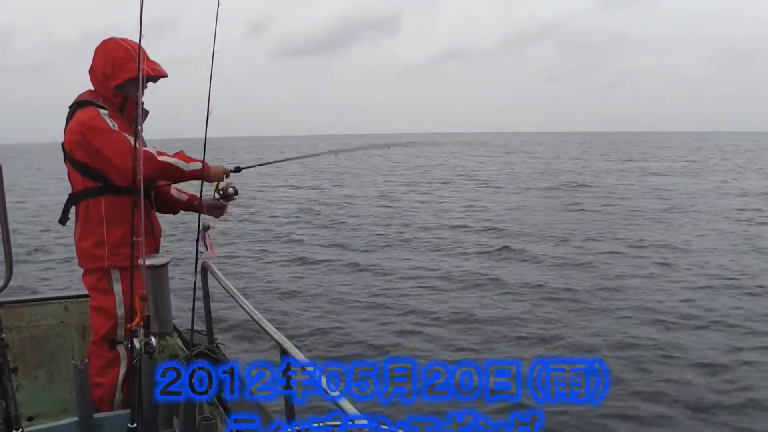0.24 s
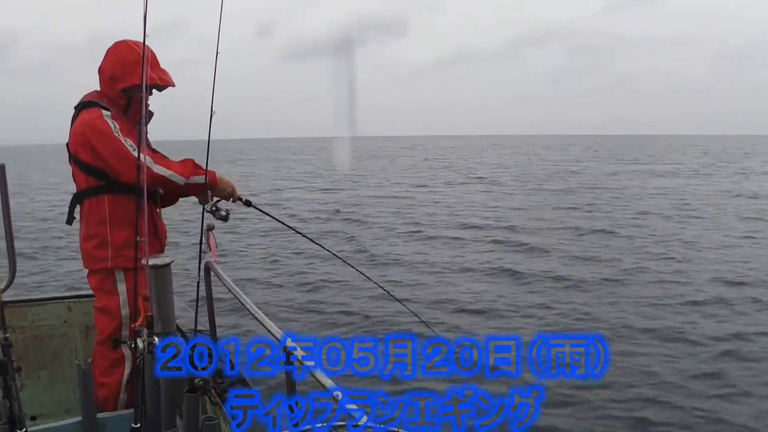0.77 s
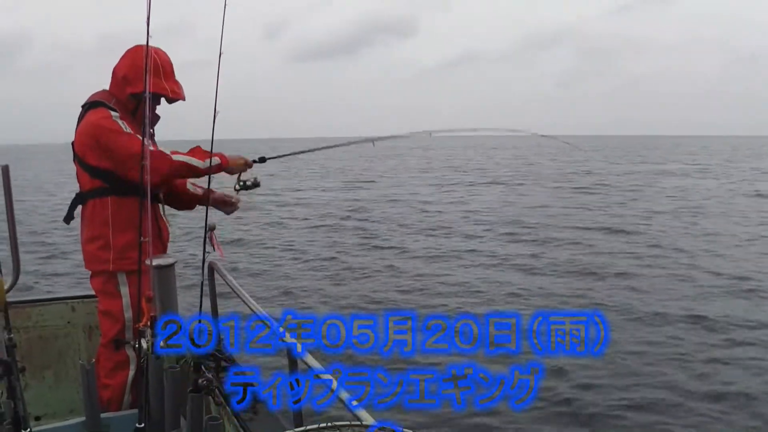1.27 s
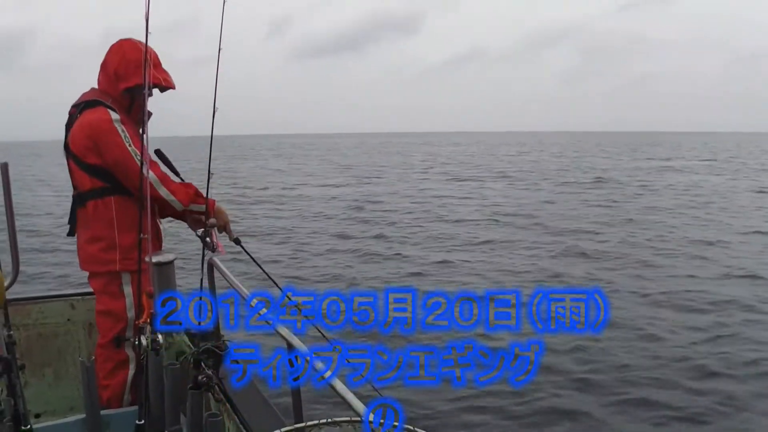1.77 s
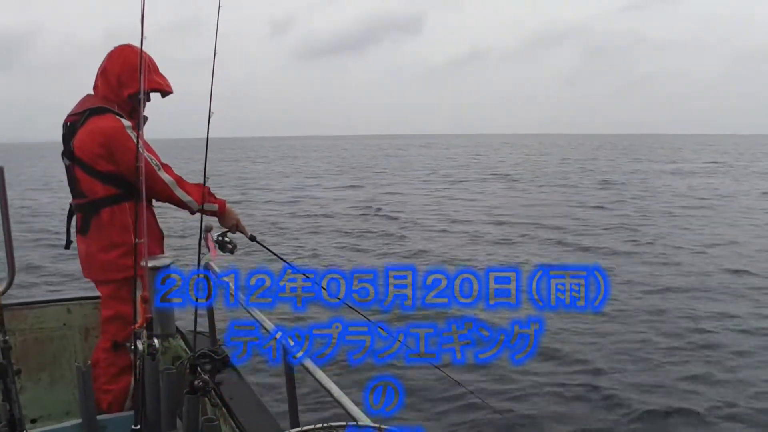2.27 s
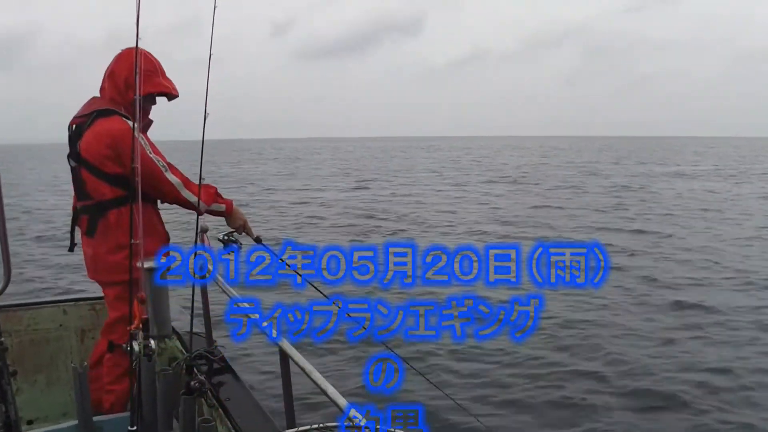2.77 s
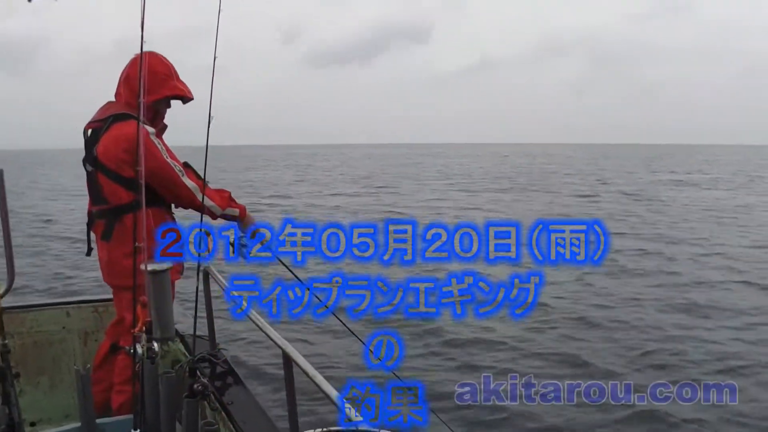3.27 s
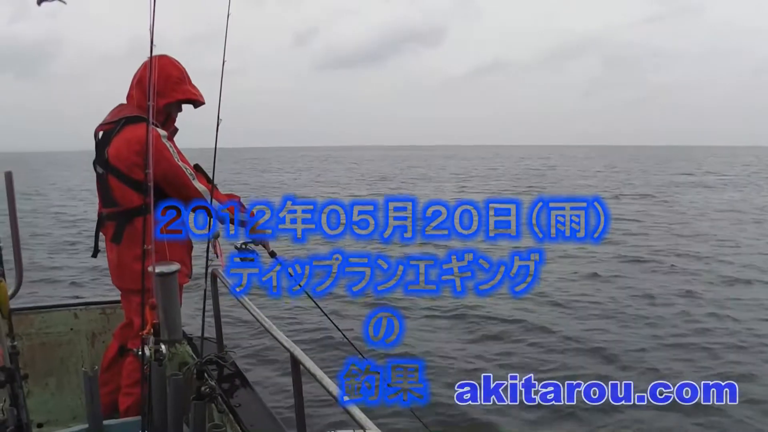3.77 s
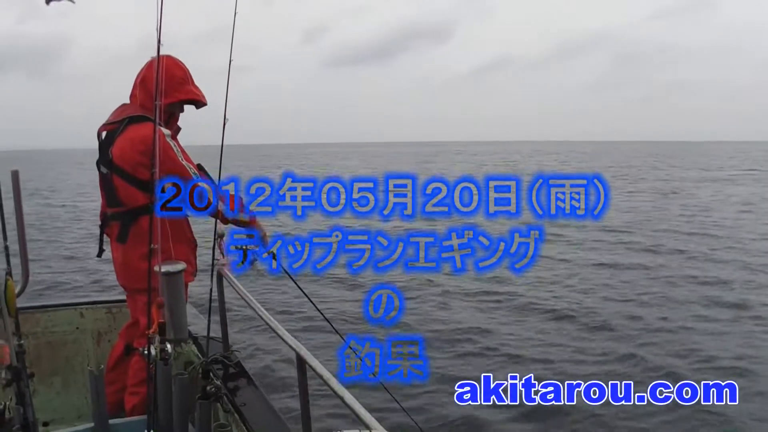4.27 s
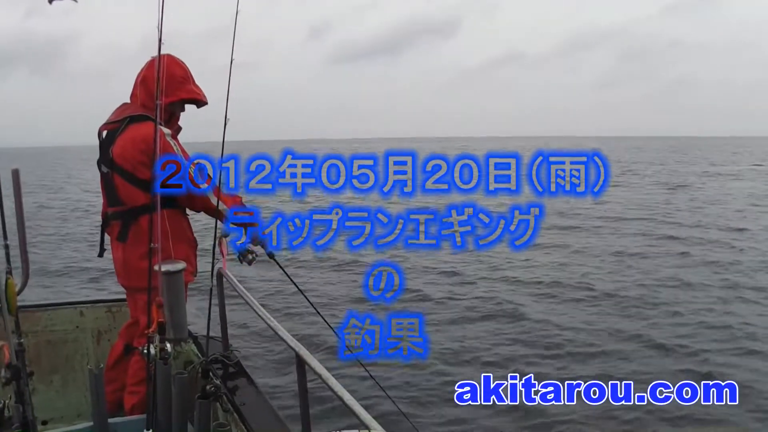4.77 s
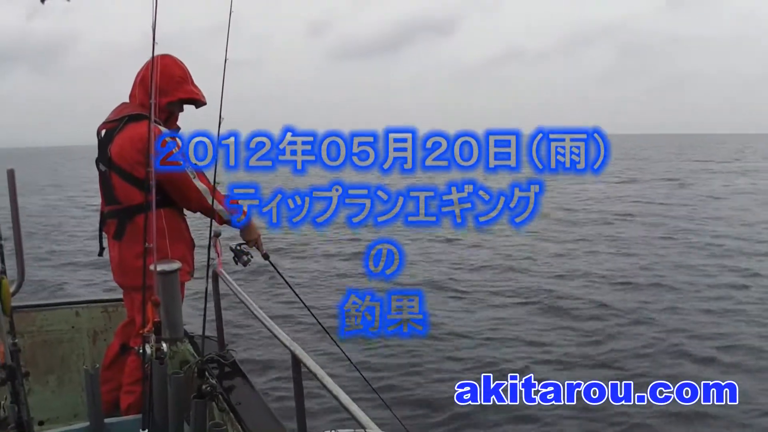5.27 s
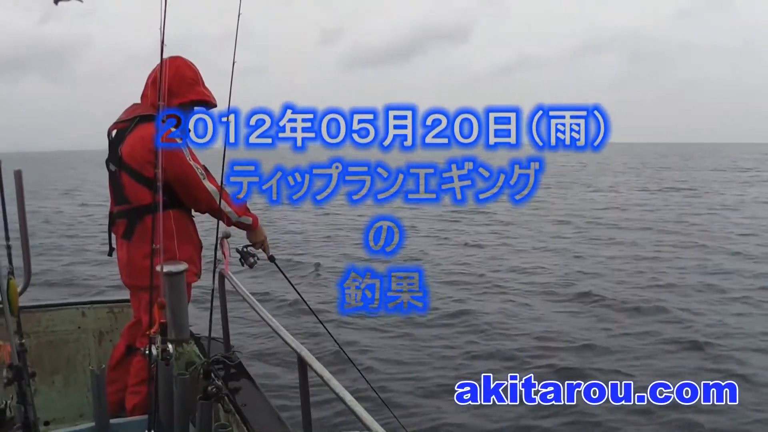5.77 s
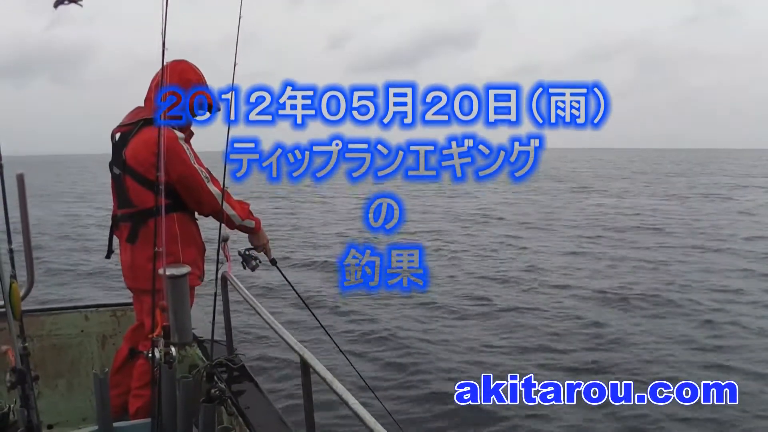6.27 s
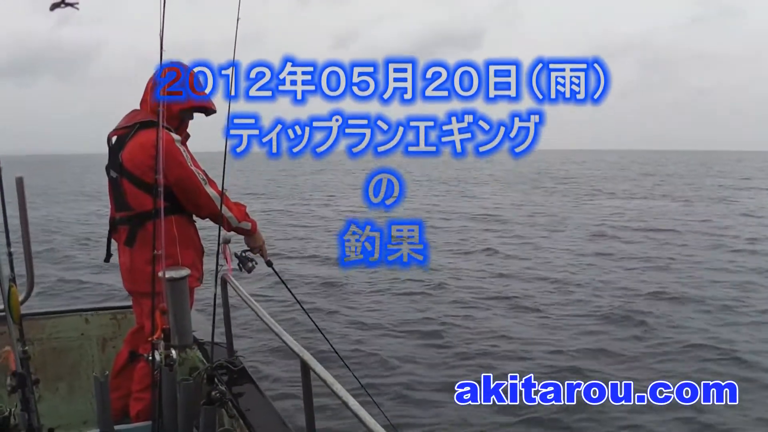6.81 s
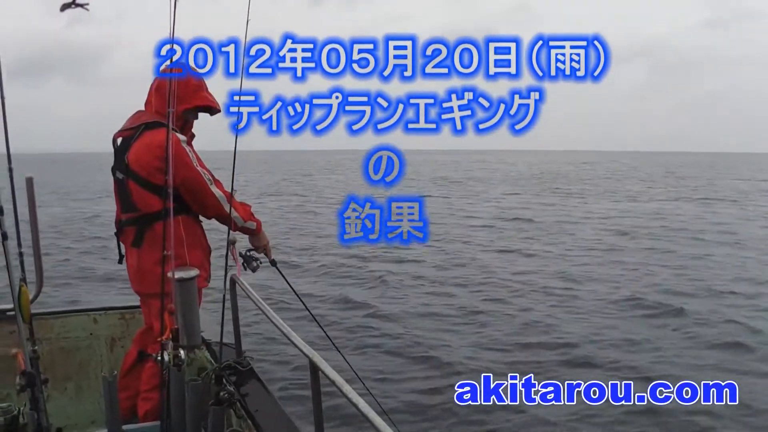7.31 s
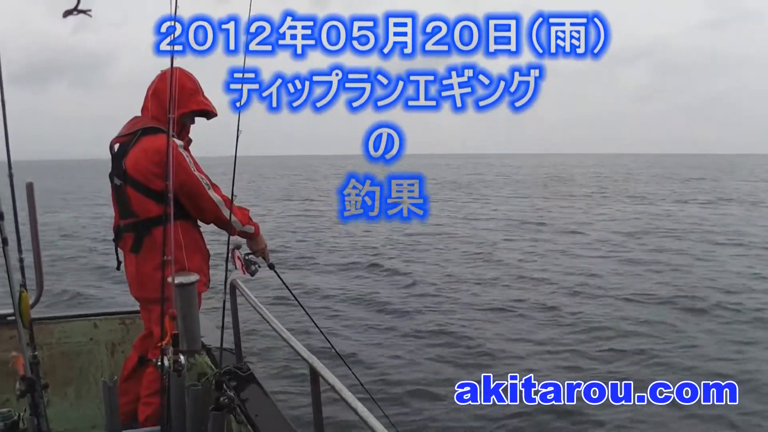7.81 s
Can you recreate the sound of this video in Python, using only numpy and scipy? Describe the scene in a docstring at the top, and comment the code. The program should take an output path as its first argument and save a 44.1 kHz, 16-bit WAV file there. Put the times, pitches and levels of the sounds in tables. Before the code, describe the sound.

Outdoors on a small fishing boat, light rain patters with crisp nearby ticks and occasional hollow knocks. For just over a second, an angler jerks a rod about three times a second: dry reel rasps, rustling rain jacket, thin line whistles and sharp clacks. Then only rain remains, with soft foam along the hull and irregular low wind thumps and flutters right at the microphone.

```python
"""Light rain on a small fishing boat

Drops tick on the deck and on rain gear as filtered clicks with short tails; a few knock on a hollow case.
An angler on the left jerks a rod about three times a second, then rests: reel and jacket rasp as
shaped noise, and the wet line whistles in the guides as bending tones. Foam made of tiny bubble clicks
washes along the hull, and gusts thump, gulp and flutter at the microphone as low noise and short tones."""
import sys
import numpy as np
from scipy import signal
from scipy.fft import rfft, irfft
from scipy.io import wavfile

SR = 44100
rng = np.random.default_rng(int(sys.argv[2]) if len(sys.argv) > 2 else 0)


def file_out(sig):
    """Save sig as 16-bit WAV at sys.argv[1]."""
    # one column per channel
    cols = np.atleast_2d(sig).T
    # limit, then scale
    lim = np.clip(cols, -1, 1)
    pcm = np.round(lim * 32767).astype(np.int16)
    wavfile.write(sys.argv[1], SR, pcm)


N = 355005
TIME = np.arange(N) / SR  # seconds
HZ = np.fft.rfftfreq(N, 1 / SR)


def from_db(db):
    """Turns decibels into a gain."""
    return 10 ** (np.asarray(db) / 20)


def unit(x):
    """Scales a signal to an rms of one."""
    return x / np.sqrt(np.mean(x ** 2) + 1e-20)


def at_hz(points, hz):
    """Reads a curve on a log-frequency axis."""
    point_hz, value = np.transpose(points)
    return np.interp(np.log(hz + 1), np.log(point_hz), value)


def in_time(rows):
    """Joins curve rows by straight lines, one array a column."""
    s, *columns = np.transpose(rows)
    return [np.interp(TIME, s, column) for column in columns]


def add(mix, s, sound):
    """Mixes a sound in at time s."""
    part = mix[..., max(round(s * SR), 0):][..., :sound.shape[-1]]
    part += sound[..., :part.shape[-1]]


def panned(x, pan_db):
    """Spreads a sound over left and right, left louder by pan_db."""
    return x * from_db(np.array([pan_db, -pan_db]).reshape(2, -1) / 2)


def random_signs():
    """A random plus or minus one for every sample."""
    return rng.choice([-1., 1.], N)


def drift(per_s):
    """Slow random wander of rms one; a higher per_s wanders faster."""
    spectrum = rfft(rng.standard_normal(N))
    return unit(irfft(spectrum * np.exp(-(HZ / per_s) ** 2), N))


def swell(s, rise_s, fall_s):
    """Builds smoothly to one at time s, then dies away."""
    return np.exp(-np.where(TIME < s, ((s - TIME) / rise_s) ** 2, (TIME - s) / fall_s))


def held(start, end, rise_s, fall_s):
    """Rises to one, holds from start to end, and dies away."""
    return np.exp(-np.maximum(start - TIME, 0) / rise_s - np.maximum(TIME - end, 0) / fall_s)


def swing(s, half_s):
    """An even rise and fall around time s."""
    return np.exp(-((TIME - s) / half_s) ** 2)


def click(spectrum, size=4096):
    """The sharpest pulse with this spectrum that has no sound before its start; its peak is one."""
    log_gain = np.log(from_db(at_hz(spectrum, abs(np.fft.fftfreq(size, 1 / SR)))))
    pulse = np.fft.ifft(np.exp(np.conj(signal.hilbert(log_gain)))).real[:size // 2]
    return pulse / abs(pulse).max()


def coloured(x, spectrum):
    """Gives a signal a spectrum without smearing it backwards."""
    return signal.oaconvolve(x, click(spectrum))[:len(x)]


def treble(x):
    """The part of a sound above about 2 kHz, by a gentle filter."""
    return signal.lfilter(*signal.butter(1, 2000, "high", fs=SR), x)


def ringing(x, hz, width):
    """One resonance with a gain of one at its peak."""
    return signal.lfilter(*signal.iirpeak(min(hz, .45 * SR), hz / width, SR), x)


def gliding(x, hz, width):
    """A resonance that follows the curve hz, by shifting that pitch to zero, smoothing and shifting back."""
    turn = np.exp(2j * np.pi * np.cumsum(hz) / SR)
    r = np.exp(-np.pi * width / SR)
    smooth = signal.lfilter([1], [1, -2 * r, r * r], x / turn)
    return unit((turn * smooth).real)


def impacts(per_s, spread_db, cap):
    """Randomly timed impulses: many small, a few large."""
    return (rng.random(N) < per_s / SR) * from_db(spread_db * np.minimum(rng.exponential(1, N), cap))


def noise_tails(t, splash_t60, tail_t60):
    """Two dying noises of equal energy: a brief splash and a longer tail, after a tiny gap."""
    fade = from_db(-60 * t / np.array([[splash_t60], [tail_t60]]))
    splash, tail = rng.standard_normal((2, len(t))) * fade * (t > .0003)
    return splash / np.linalg.norm(splash), tail / np.linalg.norm(tail)


def scatter(x, tail_db, t60, splash_db=-4, splash_t60=0.0069):
    """The impact, a brief splash, then reflections off the deck; drops at different times get different tails."""
    t = np.arange(SR // 6) / SR
    place = (np.arange(N) // 64 * 5) % 8  # short blocks of time take turns among eight tails
    out = x.copy()
    for k in range(8):
        splash, echoes = noise_tails(t, splash_t60, t60)
        tail = from_db(splash_db) * splash + from_db(tail_db) * echoes
        out += signal.oaconvolve(x * (place == k), tail)[:N]
    return out


# Level balance of the microphone pair. Each row: frequency in Hz, left minus right in dB.
PORT_BALANCE = [(100, 4), (380, 1.9), (1300, 3.2), (2400, 5.8), (4400, 10.5), (6200, 7), (8100, 2),
                (11000, -5), (15000, -5)]
# Phase shift between the pair. Each row: frequency in Hz, lead of the left in radians.
PORT_LEAD = [(30, 1.1), (400, 0.61), (1300, 0.32), (2800, 1.28), (3900, 1.6), (5100, 4), (8000, 4.11),
             (15000, 4)]
# How alike the pair hears. Each row: frequency in Hz, likeness from 0 to 1.
PORT_LIKENESS = [(100, 0.86), (700, 1), (1500, 0.84), (3000, 1), (4500, 0.44), (8000, 0.7), (15000, 0.33)]


def ports(x, stray):
    """Two microphone ports: the right one hears x late and shaded, mixed with stray reflections."""
    like = np.clip(at_hz(PORT_LIKENESS, HZ), 0, 1)
    side = from_db(at_hz(PORT_BALANCE, HZ) / 2)
    left = rfft(x)
    late = left * np.exp(-1j * at_hz(PORT_LEAD, HZ))
    right = like * late + np.sqrt(1 - like ** 2) * rfft(stray)
    return irfft(np.array([left * side, right / side]), N)


def on_deck(hits, spectrum, tail_db, t60):
    """Impulses become ticks with short tails, heard through both ports."""
    stray = hits * random_signs()
    return ports(*[coloured(scatter(x, tail_db, t60), spectrum) for x in (hits, stray)])


# Strength of the rain over time. Each row: time in seconds, relative level in dB.
RAIN_STRENGTH = [(1.45, -47), (3.1, -47), (4.95, -50.5), (5.45, -46), (5.95, -51.5), (6.4, -46),
                 (6.8, -49.5), (7.3, -47.5), (8.05, -49)]
# Tone of the patter. Each row: frequency in Hz, relative level in dB.
PATTER_SPECTRUM = [(40, -16), (150, -6.5), (260, -14), (380, 5.5), (480, 2.5), (700, -1.5), (1400, -2),
                   (2400, -4.5), (3400, -8), (5500, -11), (7500, -15.5), (9200, -15.5), (10500, -23.5),
                   (15000, -23.5)]


def rain(near_db=-.5, far_db=0.0):
    """Separate drops on the boat over a dense patter from farther off."""
    level_db, = in_time(RAIN_STRENGTH)
    drops = -impacts(per_s=110, spread_db=6, cap=2)
    near = on_deck(drops, PATTER_SPECTRUM, tail_db=-1, t60=0.09)
    crowd = impacts(per_s=2500, spread_db=0.0, cap=4.7) * random_signs()
    far = on_deck(crowd, PATTER_SPECTRUM, tail_db=3.0, t60=0.088)
    far_gain = from_db(far_db + 1.8 * drift(9.3))  # the distant patter wavers
    return from_db(level_db + 0.5) * (from_db(near_db) * unit(near) + far_gain * unit(far))


# Drops that land close by. Each row: start in seconds (before a 1.2 ms delay), relative level in dB.
CLOSE_DROPS = [(0.5, -24.5), (0.8224, -17.5), (0.9861, -24.5), (1.0833, -25.5), (1.427, -24),
               (1.463, -25.5), (1.493, -31), (1.5636, -23.5), (1.6258, -29), (1.6865, -30), (1.7855, -28),
               (1.9303, -29.5), (2.0155, -37), (2.0345, -29), (2.1885, -27), (2.2594, -22), (2.2841, -23),
               (2.5518, -30), (2.9157, -27), (3.0411, -24), (3.067, -27.5), (3.939, -28.5), (3.98, -27),
               (4.482, -26.5), (4.609, -31), (4.6369, -23.5), (4.755, -26.5), (4.8559, -29.5),
               (5.065, -23.5), (5.735, -26), (6.2245, -26), (6.281, -26.5), (6.3134, -32), (6.3309, -27.5),
               (6.411, -26.5), (6.5814, -23), (6.635, -28.5), (6.9356, -30), (7.19, -25.5), (7.3528, -24),
               (7.851, -29), (7.9869, -27.5)]
# Tone of a sharp tick. Each row: frequency in Hz, relative level in dB.
TICK_SPECTRUM = [(60, -9), (250, -7), (420, 8.5), (900, 5.5), (1500, 3.5), (3000, -2), (5500, -9),
                 (9000, -17), (15000, -34)]


def close_drops(level_db=5, splash_db=-9, spatter_db=-4):
    """Large drops snap on nearby gear, some dull and some thin, some dry and some spattering."""
    direct, stray = np.zeros(N), np.zeros(N)
    t = np.arange(SR // 10) / SR
    characters = rng.uniform(-3, 3, (len(CLOSE_DROPS), 2))  # dB of treble, dB of spatter
    for (s, db), (thin, wet) in zip(CLOSE_DROPS, characters):
        for path in direct, stray:
            splash, tail = noise_tails(t, .005, .06)
            hit = from_db(splash_db) * splash + from_db(spatter_db + wet) * tail - (t == 0)
            hit = hit + (from_db(thin) - 1) * treble(hit)
            add(path, s + 0.001198, from_db(db) * hit)
    return from_db(level_db) * ports(coloured(direct, TICK_SPECTRUM), coloured(stray, TICK_SPECTRUM))


# Drops on the hollow case. Each row: start in seconds, relative level in dB, settled ring pitch in Hz.
CASE_HITS = [(.579, -27, 434), (0.786, -27.5, 440), (1.0238, -21.5, 458), (1.688, -22.5, 416),
             (2.617, -24, 425), (4.76, -19, 418), (5.138, -25.5, 419), (7.023, -23.5, 475),
             (7.596, -19, 426)]
# Overtones of the case. Each row: multiple of the ring pitch, relative level in dB.
CASE_TONES = [(1, -0.5), (2.1, -19.5), (3.1, -23)]


def case_knocks(swell_s=0.0036, sag=0.074, snap_db=-5, ring_db=-20, ring_t60=0.3):
    """A drop snaps on a case, whose hollow swells and mostly dies within a few cycles as its pitch sags."""
    out, t = np.zeros(N), np.arange(SR // 8) / SR
    u = t / swell_s
    shape = (u * np.exp(1 - u)) ** 1.48 + from_db(ring_db - 60 * t / ring_t60)
    for s, db, hz in CASE_HITS:
        turns = np.cumsum(hz * (1 + sag * np.exp(-u))) / SR
        tone = sum(from_db(tone_db) * np.sin(2 * np.pi * k * turns) for k, tone_db in CASE_TONES)
        add(out, s, -from_db(db) * shape * tone)
        add(out, s, from_db(db + snap_db) * click(TICK_SPECTRUM))
    return panned(out, 3.1)


# Drops that plip into standing water. Each row: start in seconds, relative level in dB, starting pitch in Hz.
PLIP_DROPS = [(.985, -30, 1240), (4.968, -36, 990), (6.224, -32, 1054)]


def plips(swell_s=0.0022, rise_per_s=6):
    """A drop traps a small bubble, which rings briefly at a rising pitch."""
    out, t = np.zeros(N), np.arange(SR // 20) / SR
    shape = t / swell_s * np.exp(1 - t / swell_s)
    for s, db, hz in PLIP_DROPS:
        tone = np.sin(2 * np.pi * hz * t * (1 + rise_per_s * t / 2))
        add(out, s, from_db(db) * shape * tone)
    return ports(out, out)


def fittings(level_db=-56, low_hz=700, high_hz=4500, count=12):
    """Drops on boxes and tackle: each well-damped surface tints its ticks differently."""
    taps, sharpness = np.zeros(N), 3.5
    for hz in np.geomspace(low_hz, high_hz, count):
        hits = impacts(per_s=7, spread_db=7, cap=2.8)
        taps += ringing(hits, hz, hz / sharpness) / hz
    return from_db(level_db) * unit(ports(taps, taps))


def spatter(level_db=-62, t60=0.24, low_hz=5000, high_hz=13000, count=6):
    """Drops shatter into puffs of fine spray, some duller and some brighter."""
    puff = from_db(-60 * np.arange(SR // 8) / SR / t60)
    spray = np.zeros((2, N))
    for hz in np.geomspace(low_hz, high_hz, count):
        bursts = signal.oaconvolve(impacts(per_s=25, spread_db=4, cap=2.5), puff)[:N]
        hiss = bursts * rng.standard_normal((2, N))
        spray += ringing(ringing(hiss, hz, hz / 3), hz, hz / 3) / hz
    return from_db(level_db) * unit(ports(*spray))


# Bursts of spray. Each row: middle in seconds, half length in seconds, level in dB, centre frequency in Hz.
SPRAY_BURSTS = [(6.11, 0.017, -43.5, 3550), (6.705, 0.0064, -43.5, 7860)]


def sprays():
    """Short puffs of fine droplets: noise through a broad resonance, each with its own brightness."""
    out = np.zeros((2, N))
    for s, half_s, db, hz in SPRAY_BURSTS:
        hiss = unit(ringing(rng.standard_normal((2, N)), hz, hz / 2))
        out += from_db(db) * swing(s, half_s) * hiss
    return out


# Jerks of the rod. Each row: time of the fastest pull in seconds, relative level of the rasp in dB.
ROD_JERKS = [(-.13, -10.5), (.232, -27.5), (0.546, -31), (0.885, -26), (1.184, -28)]
# Swishes of the sleeves. Each row: middle in seconds, relative level in dB.
SLEEVE_SWISHES = [(.012, -44), (.219, -37.5), (.375, -46), (.541, -47), (.69, -46), (.872, -39.5),
                  (1.025, -42), (1.175, -42)]
# Tone of the reel. Each row: frequency in Hz, relative level in dB.
RASP_SPECTRUM = [(100, -12), (300, -9.5), (500, 3), (1100, 1.5), (2000, 1), (3300, 0.5), (4300, -4.5),
                 (5500, -5.5), (8000, -10.5), (15000, -30)]
# Tone of the jacket. Each row: frequency in Hz, relative level in dB.
SWISH_SPECTRUM = [(1000, -20), (4000, -4), (5600, -0.5), (7500, 0), (9500, -3), (15000, -10.5)]
JERK_RISE_S, JERK_FALL_S = 0.028, 0.035  # time constants of the line's pull
# the rod is lowered again after every jerk: delay, half length, relative level
RETURN_DELAY_S, RETURN_S, RETURN_RASP_DB = 0.15, 0.058, -43.5
# the jacket rustles for as long as the arms work: relative level, end, time constant of the fade
RUSTLE_DB, RUSTLE_END_S, RUSTLE_FADE_S = -49.5, 1.38, .03
SLEEVE_S = .034  # half the length of an arm's swing


def rod(rasp_db=1, swish_db=-1, uneven_db=2.0):
    """Jerks drag line from the reel in uneven bursts of tiny slips, nylon sleeves rub, a soft return follows."""
    reel = np.zeros(N)
    for s, db in ROD_JERKS:
        reel += from_db(db) * held(s, s, JERK_RISE_S, JERK_FALL_S)
        reel += from_db(RETURN_RASP_DB) * swing(s + RETURN_DELAY_S, RETURN_S)
    jacket = from_db(RUSTLE_DB) * held(0, RUSTLE_END_S, RUSTLE_FADE_S, RUSTLE_FADE_S)
    for s, db in SLEEVE_SWISHES:
        jacket += from_db(db) * swing(s, SLEEVE_S)
    slips = impacts(per_s=1800, spread_db=4, cap=2.4) * random_signs()
    slips = slips * from_db(uneven_db * drift(74))
    rasp = unit(on_deck(slips, RASP_SPECTRUM, tail_db=-0.5, t60=0.034))
    creases = from_db(2 * drift(250))
    rubs = [coloured(creases * rng.standard_normal(N), SWISH_SPECTRUM) for _ in range(2)]
    swish = unit(ports(*rubs))
    return from_db(rasp_db) * reel * rasp + from_db(swish_db) * jacket * swish


# Clacks of the reel as jerks pull it tight. Each row: start in seconds, relative level in dB.
CLACK_HITS = [(0.883, -16), (0.8864, -15.5), (0.9, -22), (1.1828, -16.5)]


def reel_clacks():
    """Sharp snaps of the reel's mechanism under load."""
    hits = np.zeros(N)
    for s, db in CLACK_HITS:
        add(hits, s, -from_db([db]))
    return on_deck(hits, TICK_SPECTRUM, tail_db=2.5, t60=0.046)


# Whistles of the line. Each row: start in seconds, length in seconds, start, middle and end pitch in Hz
# (before a small wobble), relative level in dB.
LINE_STRANDS = [(0.184, 0.047, 3050, 2980, 2870, -41), (0.232, 0.023, 3600, 3220, 2800, -38),
                (0.245, 0.05, 5000, 5250, 4800, -42), (0.243, 0.018, 2660, 2430, 2520, -41),
                (.261, 0.021, 2500, 2780, 2400, -42), (0.521, 0.046, 3340, 3230, 3200, -41),
                (.55, 0.022, 3650, 3200, 2700, -38), (0.578, 0.031, 3280, 2900, 2880, -39.5),
                (0.578, 0.035, 6200, 5380, 4550, -43), (0.597, 0.022, 2500, 2280, 2180, -46),
                (0.888, 0.04, 3490, 3450, 3530, -38), (1.198, 0.022, 3490, 3570, 3400, -32.5),
                (1.214, 0.029, 3380, 3150, 3100, -39)]


def line_whistles(level_db=-1.5, pan_db=2, rough=0.3):
    """The taut wet line sings in the guides in short strands, its pitch bending as it catches and slips."""
    out = np.zeros(N)
    wobble = 1 + .012 * drift(300)
    grip = from_db(2 * drift(250))
    scrape = drift(300) + 1j * drift(300)  # roughens the tone in strength and phase
    for s, length, start_hz, middle_hz, end_hz, db in LINE_STRANDS:
        u = np.linspace(0, 1, round(length * SR))
        span = round(s * SR) + np.arange(len(u))
        bend = np.polyfit([0, .5, 1], [start_hz, middle_hz, end_hz], 2)
        hz = np.polyval(bend, u) * wobble[span]
        turning = np.exp(2j * np.pi * np.cumsum(hz) / SR)
        tone = ((1 - rough + rough * scrape[span]) * turning).real
        add(out, s, from_db(db + level_db) * unit(grip[span] * np.sin(np.pi * u) * tone))
    return panned(ports(out, out), pan_db)


# Waves along the hull. Each row: crest in seconds, rise and fall in seconds, relative level in dB, treble
# boost in dB, pitch of the foam at the crest in Hz, glide in octaves per second (one octave at most each way).
HULL_WAVES = [(2.72, 0.09, 0.34, -41.5, 1.5, 2680, -2), (5.43, 0.33, 0.081, -38, 1.5, 2240, 1.1)]
# Tone of the foam. Each row: frequency in Hz, relative level in dB.
WATER_SPECTRUM = [(100, -29), (400, 5), (700, 5), (1200, -3.5), (2200, -8), (3500, -8.5), (6000, -14.5),
                  (10000, -25.5), (15000, -41)]


def sea(level_db=0, pan_db=-4.0, churn_db=1.9, band_db=-6, band_width_hz=1300):
    """Foam on the open side: each wave swells into a crowd of bursting bubbles whose pitch slides as it passes."""
    bubbles = []
    for _ in range(2):
        bursts = impacts(per_s=5000, spread_db=4, cap=3) * random_signs()
        bubbles.append(coloured(bursts, WATER_SPECTRUM))
    foam = unit(ports(*bubbles))
    fizz, wash = treble(foam), 0
    for s, rise_s, fall_s, db, treble_db, hz, glide in HULL_WAVES:
        pitch = hz * 2 ** np.clip(glide * (TIME - s), -1, 1)
        band = gliding(foam, pitch, band_width_hz)
        water = foam + (from_db(treble_db) - 1) * fizz + from_db(band_db) * band
        wash = wash + from_db(db) * swell(s, rise_s, fall_s) * water
    return from_db(level_db + churn_db * drift(25)) * panned(wash, pan_db)


# Rounded gulps amid the buffeting. Each row: start in seconds, length in seconds, start and end pitch in Hz
# (before a random waver), level in dB, left minus right in dB, likeness of the ports from -1 to 1.
WIND_GULPS = [(2.56, 0.026, 280, 300, -30.5, -7, -0.67), (2.587, 0.027, 330, 275, -30.5, -1, -0.4),
               (5.018, 0.039, 398, 360, -35.5, 0, 0.99), (5.354, .034, 308, 280, -29, -1, 1),
              (5.43, 0.0092, 393, 338, -24, 0, 1), (6.064, 0.038, 583, 1030, -35.5, 0, 0.95),
              (6.065, 0.023, 476, 394, -25.5, -0.5, 1), (6.101, 0.0092, 404, 270, -23.5, 0, 1),
              (6.109, 0.036, 840, 790, -43, -1, 1), (6.715, 0.025, 402, 463, -28, 0, 0.95),
              (6.735, 0.023, 316, 348, -27, -1, 1)]


def gulps(level_db=0, waver=0.087, lumpy_db=2):
    """Wind rings the microphone cavities for a short while at a sliding pitch, together or in opposition."""
    out = np.zeros((2, N))
    wobble, lumps = 1 + waver * drift(210), from_db(lumpy_db * drift(170))
    for s, length, start_hz, end_hz, db, pan_db, likeness in WIND_GULPS:
        window = signal.windows.tukey(round(length * SR), .6)
        span = round(s * SR) + np.arange(len(window))
        hz = np.linspace(start_hz, end_hz, len(span)) * wobble[span]
        phase = 2 * np.pi * np.cumsum(hz) / SR
        angle = np.arccos(np.clip(likeness, -1, 1)) / 2
        pair = unit(window * lumps[span] * np.sin([phase + angle, phase - angle]))
        add(out, s, panned(from_db(db + level_db) * pair, pan_db))
    return out


# Hard eddies at the microphone. Each row: start in seconds, length in seconds, relative level in dB,
# left minus right in dB, likeness of the ports from -1 to 1.
HARD_EDDIES = [(2.547, 0.06, -35.5, -5, -0.85), (2.581, 0.0074, -19, -2, -0.88),
               (3.14, 0.039, -36.5, 8.5, -1), (3.418, 0.016, -35.5, -1, 1), (3.971, 0.034, -33.5, 4, -0.34),
               (4.165, 0.03, -35.5, -5, -0.7), (4.656, 0.022, -25, 9, -0.82), (4.675, 0.051, -30, 3, -0.73),
               (4.85, 0.046, -36, -3, -0.21), (5.331, 0.15, -30.5, -0.5, 1), (5.447, 0.19, -34, 0, 1),
               (5.756, 0.054, -26.5, -2, -0.89), (5.873, 0.159, -34.5, -0.5, 1),
               (6.053, 0.1, -30.5, -0.5, 1), (6.423, 0.021, -31, 9, -0.86),
               (6.438, 0.079, -33.5, 3.5, -0.76), (6.694, 0.081, -35, 0, 1), (6.774, 0.045, -38.5, 0, 1)]
# Tone of the cavities' flutter. Each row: frequency in Hz, relative level in dB.
FLUTTER_SPECTRUM = [(30, -50), (100, -4), (200, -5.5), (290, -2), (380, 3), (460, -3), (560, -9),
                    (800, -24.5), (1200, -53), (3000, -60)]
# Tone of the torn, higher part. Each row: frequency in Hz, relative level in dB.
SHEAR_SPECTRUM = [(200, -15), (600, 0), (900, 0), (1300, -12), (3000, -52)]


def eddies(level_db=0, shear_db=6, lumpy_db=2.0, opposed_low_hz=220):
    """Hard eddies flutter in the microphone cavities, pushing both ports together or in opposition."""
    out, lumps = np.zeros((2, N)), from_db(lumpy_db * drift(45))

    def lumpy_pair(spectrum):
        """Two separate noises that share the same lumps."""
        return np.array([unit(coloured(lumps * rng.standard_normal(N), spectrum)) for _ in range(2)])

    flutter, shear = lumpy_pair(FLUTTER_SPECTRUM), lumpy_pair(SHEAR_SPECTRUM)
    # the opposed part of the flutter loses its deepest pressure
    high_pass = signal.butter(3, opposed_low_hz, "high", fs=SR, output="sos")
    flutter[1] = signal.sosfilt(high_pass, flutter[1])
    for s, length, db, pan_db, likeness in HARD_EDDIES:
        window = signal.windows.tukey(round(length * SR), .5)
        span = round(s * SR) + np.arange(len(window))
        # the harder the eddy, the more it tears into higher pitches
        torn = from_db(db + shear_db) * shear[:, span]
        mid, side = map(unit, window * (flutter[:, span] + torn))
        angle = np.arccos(np.clip(likeness, -1, 1)) / 2
        pair = np.cos(angle) * mid + np.sin(angle) * np.array([side, -side])
        add(out, s, panned(from_db(db + level_db) * pair, pan_db))
    return out


# Single low thumps. Each row: middle in seconds, peak in dB, pitch in Hz, left minus right in dB.
LOW_THUMPS = [(1.608, -36, 110, 5), (3.157, -29, 104, 6), (3.181, -27.5, 110, 6), (4.183, -24.5, 106, 8),
              (4.665, -16, 115, 8.5), (4.7, -24.5, 109, 8), (6.111, -23.5, 140, 1), (6.468, -22, 116, 0),
              (6.736, -26, 120, 0), (6.786, -30, 106, 0), (7.016, -27.5, 94.5, 0)]


def thumps(level_db=0, cycles=0.96):
    """Single low pressure pulses: a cosine under a bell-shaped fade about a cycle to each side."""
    out, t = np.zeros((2, N)), np.arange(-SR // 25, SR // 25) / SR
    for s, db, hz, pan_db in LOW_THUMPS:
        pulse = -np.cos(2 * np.pi * hz * t) * np.exp(-(hz * t / cycles) ** 2)
        add(out, s + t[0], panned(from_db(db + level_db) * pulse, pan_db))
    return out


# Gusts that buffet the microphone. Each row: start in seconds, length in seconds, relative level in dB,
# left minus right in dB.
WIND_GUSTS = [(1.577, 0.056, -39, 7), (2.491, 0.17, -40, 2.5), (2.916, 0.17, -44, 7.5),
              (3.136, 0.072, -38, 4), (3.24, 0.24, -43, -0.5), (3.932, 0.1, -38.5, 8.5),
              (4.085, 0.28, -42, 7.5), (4.45, 0.071, -39.5, 6.5), (4.654, 0.093, -32.5, 0),
              (4.745, .045, -35, 0), (4.83, .24, -41.5, 0), (5.175, 0.055, -33.5, 0),
              (5.292, 0.31, -36.5, -1), (5.742, 0.073, -38, 0), (5.885, 0.24, -38, 0.5),
              (6.324, 0.039, -39, 8), (6.436, 0.12, -35.5, 0.5), (6.7, 0.12, -34, 0),
              (6.872, 0.23, -43.5, 0), (7.283, 0.028, -41, 9), (7.96, .09, -46.5, 9)]
# Tone of the wind. Each row: frequency in Hz, relative level in dB.
RUMBLE_SPECTRUM = [(15, -51), (35, -14), (60, -4.5), (100, -0.5), (130, -3), (180, -11), (260, -19),
                   (400, -16), (700, -35), (2000, -78)]
GUST_RISE_S, GUST_FALL_S = 0.012, 0.033  # time constants of a gust's edges
CALM_DB = -60  # light air between the gusts, relative level


def wind(level_db=-1.0, apart=0.0078):
    """Low turbulence, nearly alike at both ports: separate gusts over light air."""
    power = from_db(CALM_DB) ** 2
    for s, length, db, pan_db in WIND_GUSTS:
        gust = from_db(db) * held(s, s + length, GUST_RISE_S, GUST_FALL_S)
        power = power + panned(gust, pan_db) ** 2
    mid, side = (unit(coloured(rng.standard_normal(N), RUMBLE_SPECTRUM)) for _ in range(2))
    return from_db(level_db) * np.sqrt(power) * np.array([mid + apart * side, mid - apart * side])


def scene():
    """Rain, angler, sea and wind in the open air."""
    drops = rain() + close_drops() + case_knocks() + plips() + fittings() + spatter() + sprays()
    angler = rod() + reel_clacks() + line_whistles()
    air = gulps() + eddies() + thumps() + wind()
    return drops + angler + sea() + air


def record(dry):
    """Cuts off the sound above about 15.2 kHz with a steep filter."""
    low_pass = signal.firwin(301, 15200, window=("kaiser", 8), fs=SR)
    return signal.oaconvolve(dry, low_pass[None], "same")


dry = scene()
out = record(dry)
file_out(out)
```